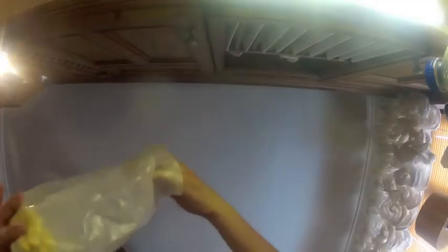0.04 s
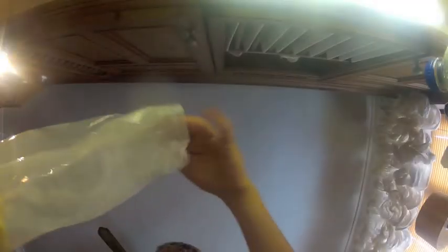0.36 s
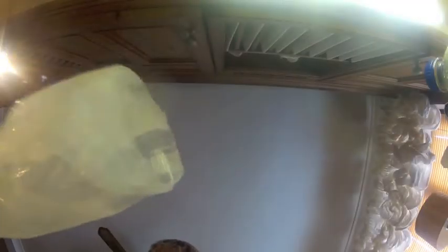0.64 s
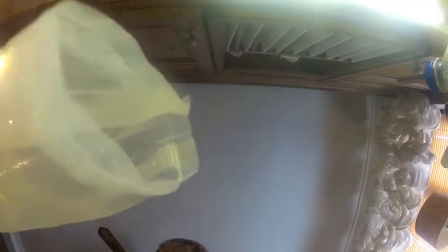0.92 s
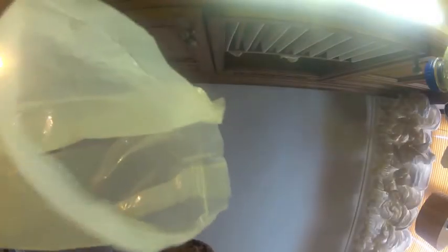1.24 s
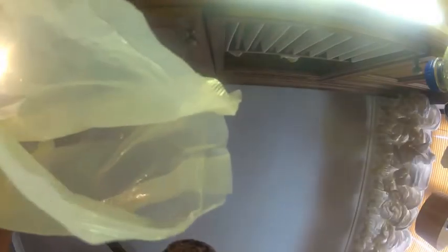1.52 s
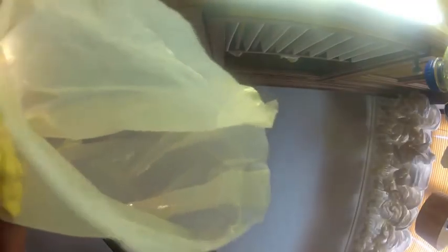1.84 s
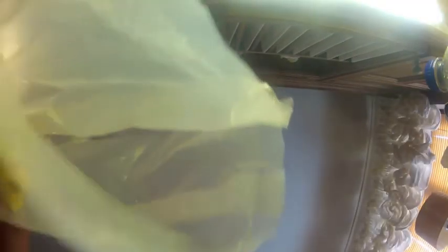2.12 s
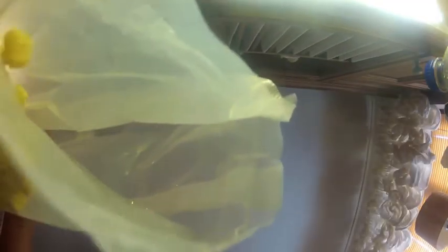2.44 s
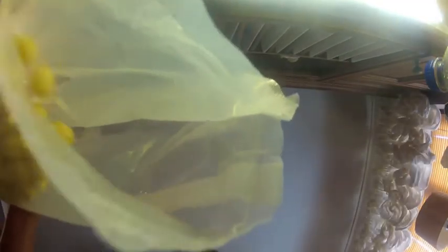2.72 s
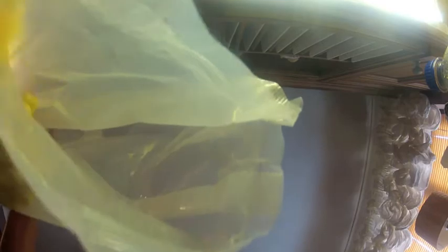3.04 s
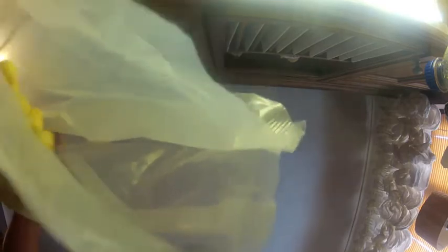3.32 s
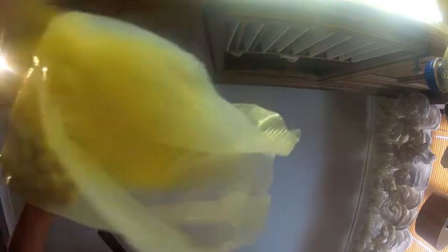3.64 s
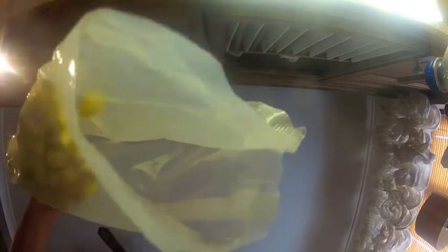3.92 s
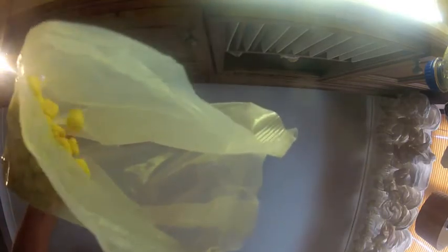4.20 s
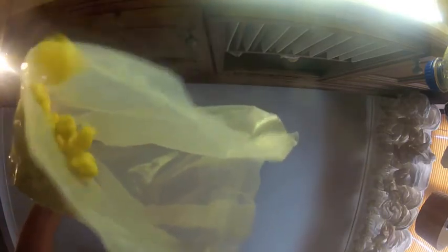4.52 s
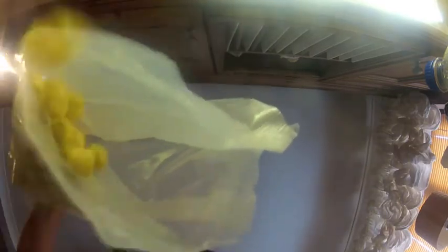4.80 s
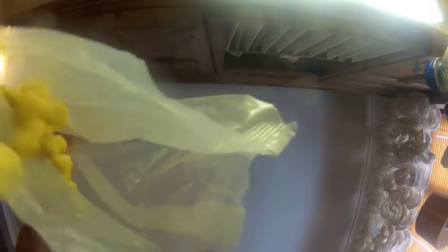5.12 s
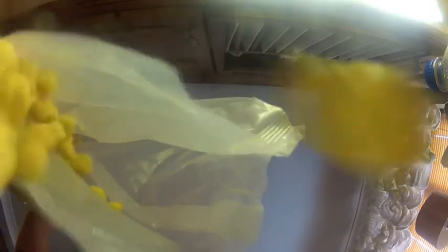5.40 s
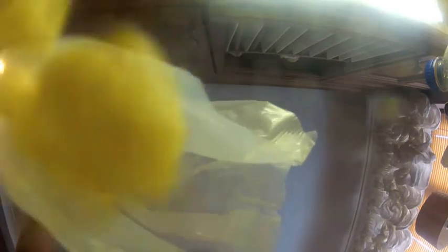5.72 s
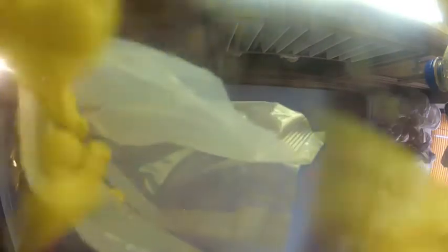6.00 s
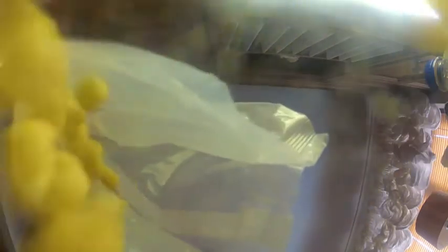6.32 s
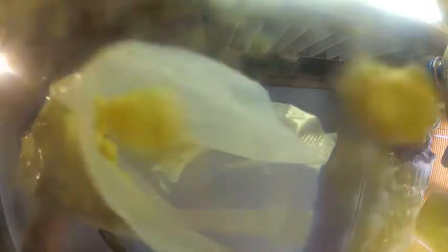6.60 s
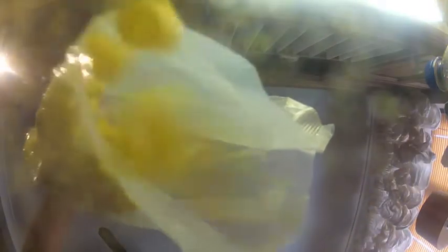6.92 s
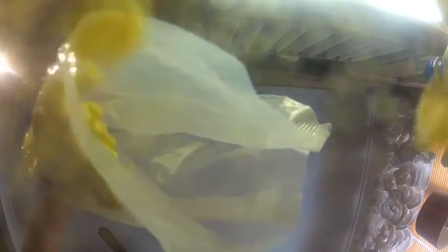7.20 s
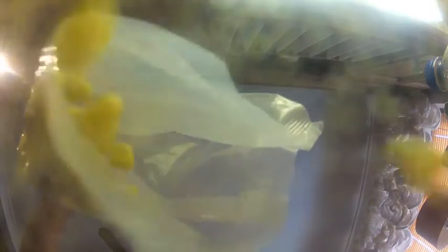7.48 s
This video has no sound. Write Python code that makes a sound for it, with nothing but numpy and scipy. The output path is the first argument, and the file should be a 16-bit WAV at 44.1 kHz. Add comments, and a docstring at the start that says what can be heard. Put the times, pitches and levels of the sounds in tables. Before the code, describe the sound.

Close crinkling of a plastic bag, followed by dry kernels trickling, then streaming into a metal pan with sharp clacks and occasional pings.

```python
"""Dry kernels pour into a metal pan, first one by one, then in a dense stream.
They clack on a small plastic case that lies in the pan with the microphone inside, patter all around
and now and then set the metal ringing. Before the pour, their thin plastic bag rustles as it is opened
and bumps the pan as it is tipped. The hardest clacks overload the microphone's recorder, which also
makes the treble gritty. Faint air noise and mains hum lie underneath."""
import sys
import numpy as np
from scipy import signal
from scipy.fft import rfft, irfft
from scipy.io import wavfile
from scipy.ndimage import uniform_filter1d

SR = 44100
rng = np.random.default_rng(int(sys.argv[2]) if len(sys.argv) > 2 else 0)


def transcribe(u):
    """Save the signal u as a 16-bit wav file named by the first command-line argument.

    u: samples, shape (n,) or (channels, n), limited to [-1, 1]; the rate is SR.
    q: integer samples, one column per channel.
    """
    v = np.clip(np.atleast_2d(u).T, -1, 1)
    q = np.round(v * 32767).astype(np.int16)
    wavfile.write(sys.argv[1], SR, q)


N = 341775

# the hardest kernels to hit the case; the last three columns are relative to the clack:
# (time [s], clack level [dB], favoured pitch [Hz], brightness [dB], knock [dB], thud [dB])
HARD_HITS = [(2.6226, -13, 2090, -8, 7, -17), (2.661, -12.5, 2130, -19, -4.5, -12),
             (2.75, -6.5, 2080, -5.5, -12.5, -8), (2.7712, -23, 2050, 12, -13, -22),
             (2.7846, -9, 2800, -7, -19, -20), (2.839, -16.5, 2150, -7, -10, -28),
             (2.8452, -16, 2040, -8, -8.5, -37), (2.8737, -20, 4070, 2, -15, -30),
             (2.8877, -14, 2050, -4.5, -15, -12), (2.9287, -8, 2040, -13, -6.5, -12),
             (2.9488, -15.5, 2030, -4, -18, -26), (2.9647, -15, 2630, 2, -6, -15),
             (2.9896, -15.5, 2880, -7, -7.5, -19), (3.0126, -10.5, 2610, -10, -15, -18),
             (3.0651, -12.5, 2140, -9, -6, -5), (3.0963, -10, 2640, -2, -19, -27),
             (3.1183, -15.5, 2560, -3, -27, -29), (3.1298, -24.5, 3710, 3, -12, -21),
             (3.167, -22, 2880, -3, -27, -28), (3.1936, -9, 2280, 4.5, -16, -10.5),
             (3.3146, -11.5, 2820, -8, -8, -18), (3.3558, -24, 2710, -5, -14, -27),
             (3.3889, -12.5, 2640, 1, -14, -35), (3.4157, -19.5, 2650, -3, -7.5, -22),
             (3.4757, -11.5, 3130, -6.5, -6.5, -13.5), (3.5179, -12, 3000, -2, -18, -16),
             (3.5352, -21.5, 2970, -6, -12.5, -23), (3.624, -8, 2540, -15, -4.5, -3.5),
             (3.7273, -8, 2540, 0, -6, -8), (3.7463, -16, 4390, 14, -1, -27),
             (3.7699, -8.5, 2520, -10, -5.5, -13), (3.9009, -8, 2150, -3.5, -14.5, -9),
             (3.9211, -13.5, 2180, -6, -14, -27), (3.952, -16.5, 4050, 0, -11, -35),
             (4.0087, -7.5, 2100, -7, -12.5, -24), (4.0206, -20, 2050, -11, -12, -27),
             (4.0466, -16.5, 2870, -3, -10, -26), (4.0556, -17.5, 2760, -6, -14, -26),
             (4.1324, -19, 2710, -10, -15, -20), (4.1526, -18, 2950, 4, -8, -10),
             (4.1671, -17, 2600, -4, -7, -18), (4.1984, -16.5, 2210, -4, -16, -22),
             (4.256, -11.5, 4170, -3, -7, -12), (4.2992, -14, 1960, -13, -14, -12.5),
             (4.3187, -11.5, 2580, -3, -13, -11), (4.339, -8.5, 2530, -2, -19, -7.5),
             (4.3519, -12, 2320, 4, -20, -19), (4.446, -11, 2340, -5.5, -22, -9),
             (4.48, -18, 2400, -6, -43.5, -22), (4.526, -21.5, 2350, -5, -16, -14),
             (4.5674, -8, 2620, -5.5, -2, -8), (4.5914, -15, 4140, 0, -16, -19),
             (4.6326, -17, 3960, 1, -20, -10), (4.6443, -5, 2570, -2, -4.5, -17),
             (4.6694, -12.5, 2560, -5, -4, -2.5), (4.6787, -22, 2270, -5, -19, -22),
             (4.6946, -12, 4010, -1, -22, -15), (4.7135, -15, 4150, 7, -11, -3),
             (4.736, -18, 2040, -7, -8.5, -28), (4.8015, -12.5, 2660, 1, -12.5, -12.5),
             (4.8572, -12.5, 2000, -2, -1, -32), (4.88, -14, 2640, -28, -8, -25),
             (4.9298, -10.5, 2200, -8, -17, -12), (4.9598, -12, 4050, 0, -14, -14),
             (4.9898, -10.5, 3980, -2, -23, -12), (5.006, -15, 3150, 3, -11, -2),
             (5.0895, -15, 3280, -4, -19, -16), (5.2205, -12.5, 2570, -3, -15, -28),
             (5.3053, -11, 3150, -5, -8, -21), (5.386, -13.5, 3020, -4.5, -8, -20),
             (5.4179, -10.5, 2930, -2, -17, -14), (5.4879, -16.5, 2510, 1, -6, -19),
             (5.5462, -15, 2500, -3, -6, -20), (5.5747, -22, 2030, -10, 0, -10),
             (5.6008, -21, 2730, -2, -17, -13), (5.617, -20.5, 2510, -9, -23, -13),
             (5.6484, -13, 2120, -1, -0.5, -1.5), (5.6745, -14.5, 4080, 7, -17, -3),
             (5.7347, -12.5, 2170, 1, -5.5, -33), (5.7548, -15, 2530, 3, -6, -20),
             (5.806, -9.5, 3900, -4, -6, -19), (5.8295, -17, 2400, -3, -2, -1),
             (5.852, -19, 2040, -11, -8, -22), (5.8851, -15.5, 2220, -6, -2.5, -23),
             (5.8922, -14, 2170, 2, -2, -12), (5.932, -17.5, 3770, 2, -8, -4),
             (5.943, -16, 2200, 0, -6, -18), (5.9797, -15.5, 2520, -5, -5, -8.5),
             (6.0088, -14, 2650, -21, -11.5, -34), (6.072, -14, 2530, -3, -5.5, -17),
             (6.142, -16, 2050, -2, -8, -16), (6.2171, -14.5, 2530, -7, -2.5, -10),
             (6.2489, -21, 2130, -8, 0, -3), (6.29, -20.5, 2630, -3, -4, -20),
             (6.3249, -10.5, 2460, -9, -4, -5.5), (6.3428, -11.5, 2580, -9, 3.5, -4.5),
             (6.4068, -15, 2590, -3, -8, -9), (6.4186, -18.5, 2500, 9, 0.5, -6),
             (6.463, -19, 2550, 5, -13, -19), (6.4793, -17.5, 3730, 4, -4, -28),
             (6.5682, -15.5, 2630, -5, -8, -21), (6.5907, -10, 2340, -10, -3, -5.5),
             (6.6467, -18, 2240, 1, -2.5, -25.5), (6.7077, -17.5, 2330, 2, 0, -20),
             (6.7635, -8.5, 2120, -1.5, -2, -15), (6.8272, -13, 2140, -2, 1, -8),
             (6.8987, -15.5, 3230, -10.5, -6, -15), (6.9418, -11.5, 2120, -6, 2, -21),
             (6.9717, -13, 3720, 3, -12, -9.5), (6.9872, -12, 2240, -7, 0.5, -7.5),
             (7.0427, -14, 2140, -6, 1, -22), (7.0647, -17, 2230, -16, 1.5, -23),
             (7.0993, -11, 2040, -0.5, -2.5, -3.5), (7.1418, -18.5, 2270, 1, -12, -18),
             (7.173, -19.5, 3860, 10, -0.5, -3), (7.1967, -16, 3770, 11, -4, -3.5),
             (7.2389, -14, 2200, -4, 2.5, -3), (7.3732, -10, 2200, -2, -0.5, -7.5),
             (7.4372, -16, 2880, -4, -5.5, -9), (7.476, -9, 3730, 4.5, -2, -3.5),
             (7.5161, -16, 2160, -3, -5, -18), (7.5256, -18, 2220, -6, -1, -10),
             (7.5331, -9, 2500, -14, -2, -3.5), (7.5409, -21, 2550, -7, 1, -2),
             (7.6036, -13.5, 2180, -2, 1.5, -12), (7.642, -16.5, 2080, -1, -1, -7),
             (7.6513, -18, 2170, -6, -2.5, -6), (7.6838, -17.5, 2190, -4, -3, -17)]
# the clack of the case's stiff walls: (pitch [Hz], width [Hz], level [dB])
CLACK_MODES = [(1550, 190, -4.5), (2042, 340, 2.5), (2260, 200, 4.5), (2573, 250, 2.5), (2920, 240, 0),
               (3327, 330, -1.5), (3766, 172, 2), (3992, 420, -1.5), (4630, 230, 0), (5400, 690, -2)]
# the hollow knock of the case: (pitch [Hz], width [Hz], level [dB])
KNOCK_MODES = [(714, 282, 4), (932, 478, 1), (1274, 364, -3.5)]
# the thud of the whole case on the pan: (pitch [Hz], width [Hz], level [dB])
THUD_MODES = [(44, 50, -5), (115.4, 97, 0.5), (292, 270, -1)]
# how strongly the kernels flow out of the bag: (time [s], level [dB])
POUR_FLOW = [(2.62, -53), (2.72, -38), (2.78, -41), (2.97, -34), (3.42, -30), (3.68, -43), (3.82, -35),
             (3.98, -37), (4.05, -32.5), (4.2, -24.5), (4.33, -30), (4.42, -40.5), (4.48, -31.5),
             (4.61, -41.5), (4.69, -27), (4.9, -27), (5.1, -23), (6.1, -25), (6.28, -26), (6.55, -23.5),
             (6.74, -27.5), (6.82, -32), (7.03, -34.5), (7.16, -24), (7.5, -35), (7.62, -23.5),
             (7.75, -25.5)]
# light kernels sound hollower once the heap covers the case: (time [s], knock relative to clack [dB])
HOLLOWNESS = [(2.62, -12), (4.2, -8), (5.15, -14.5), (5.8, -7.5), (7.75, -4)]
# kernels that hit bare metal: (time [s], level [dB], ring time [s])
METAL_HITS = [(2.731, -22.5, 0.17), (2.876, -32, .55), (3.12, -38, 0.38), (3.39, -49, .23),
              (3.843, -29, 0.81), (4.155, -41, .4), (5.091, -29, .21), (5.481, -33, 0.34),
              (6.691, -33, 0.31), (7.071, -26.5, 0.24), (7.324, -27, 0.26)]
# the tones of the pan's metal: (pitch [Hz], level [dB])
PAN_MODES = [(1254, -10), (2950, 0), (5141, -1)]
# the boom of the pan's floor, a single row: (pitch [Hz], width [Hz], level [dB])
FLOOR_BOOM = (258, 14, -43.5)
# the bag is opened, swung over the pan and held: (time [s], crinkle level [dB])
BAG_SWING = [(0, -35.5), (.38, -39.5), (.55, -58.5), (.67, -50.5), (.73, -44), (.93, -32.5), (1.05, -35.5),
             (1.3, -39), (1.6, -43), (1.8, -51.5), (2.6, -43), (3.7, -57), (7.75, -45)]
# tugs and shakes of the bag: (time [s], length [s], flutter level [dB], crinkle level [dB])
BAG_TUGS = [(0, 0.11, -31.5, -34.5), (0.167, 0.12, -28, -31.5), (0.29, 0.052, -23, -24.5),
            (1.91, 0.092, -35.5, -42.5), (2.061, 0.12, -35.5, -39), (2.201, 0.13, -40.5, -43),
            (2.373, 0.12, -31, -42.5), (2.512, 0.12, -34, -48), (3.534, 0.091, -32.5, -48),
            (4.524, 0.15, -39.5, -52)]
# the resonances of the crinkling plastic: (pitch [Hz], width [Hz], level [dB])
CREASE_MODES = [(1320, 370, -5.5), (1880, 380, -0.5), (2770, 550, 2), (4040, 800, -1.5), (5200, 1800, -10)]
# large creases snapping: (time [s], level [dB])
CREASE_SNAPS = [(.107, -30), (.119, -31), (.3, -22), (0.336, -22.5), (0.4, -20.5), (0.406, -32),
                (2.47, -37), (2.514, -32.5), (2.563, -35)]
# the tone colour of the flapping plastic: (frequency [Hz], level [dB])
FLUTTER_SPECTRUM = [(25, -11), (60, -10), (130, -1.5), (290, -2), (410, 2), (510, -3.5), (640, 0.5),
                    (780, -6.5), (900, -6), (1100, -19), (1500, -22.5), (3000, -29)]
# the bag flaps more deeply as it goes slack: (time [s], bass gain [dB])
BAG_SLACK = [(0, -7.5), (.4, -1), (.8, 0.5), (1.5, 1), (2.1, 2.5), (3.0, -6), (7.75, -4)]
# soft bumps of the bag on the pan: (time [s], peak level [dB], contact time [s])
BAG_BUMPS = [(0.687, -18, 0.006), (0.6971, -16.5, 0.0037), (0.7224, -6.5, 0.0046), (2.269, -24, 0.0033),
             (2.412, -19.5, 0.00082), (2.574, -14.5, 0.00036)]
# the tones a bump sets off: (pitch [Hz], level [dB], ring time [s])
BUMP_TONES = [(260.5, -6, 0.16), (293, -13, 0.072), (630, 0, 0.031)]
# the case rocks briefly, a single row: (time [s], level [dB], rate [Hz], ring time [s])
CASE_ROCKING = (.905, -25, 24, .27)
# the tone colour of the room's still air: (frequency [Hz], level [dB])
AIR_SPECTRUM = [(18, -33), (30, -10), (54, -11), (70, -12), (249, -18), (420, -13.5), (1300, -28),
                (2560, -38.5), (5500, -64), (7150, -76.5), (12100, -120)]


def kernels(hit_samples=3072):
    """Hard and light kernels hit the case; their blows also keep the pan sounding."""
    chatter = rng.standard_normal((len(HARD_HITS), hit_samples))
    sound, force = case_hits(HARD_HITS, chatter) + light_kernels()
    return sound + floor_boom(force) + wall_ring(force)


def case_hits(rows, chatter, full_force_db=-6.5, light_s=0.00017, hard_s=0.0019, rise_s=0.0001,
              decay_s=0.0011, tail_s=0.0032, tail_db=-22, split_hz=3250, hard_boost_db=5.0):
    """A kernel chatters on the case, longer if it lands hard. Gives two tracks: sound and force."""
    times, level_db, pitches, bright_db, knock_db, thud_db = np.transpose(rows)
    t = np.arange(chatter.shape[1]) / SR
    hardness = np.clip(from_db(level_db - full_force_db), 0, 1)[:, None]
    contact_s = light_s + hard_s * hardness
    envelope = np.exp(-np.maximum(t - contact_s, 0) / decay_s) + from_db(tail_db) * np.exp(-t / tail_s)
    force = chatter * envelope * (1 - np.exp(-t / rise_s))
    # the spot where a kernel lands favours one wall resonance
    walls = np.array([hit + 1.66 * signal.lfilter(*signal.iirpeak(hz, Q=7, fs=SR), hit)
                      for hit, hz in zip(case_walls(force), pitches)])
    # a sharp tip drives the upper resonances, a flat side the lower ones
    lower, upper = (unit_rms(filtered(walls, 7, split_hz, side)) for side in ("low", "high"))
    clack = from_db(2.5) * unit_blow(lower + from_db(bright_db + 2.5)[:, None] * upper)
    knock = from_db(knock_db + 1.5)[:, None] * unit_blow(resonate(force, KNOCK_MODES))
    # the kernel also gives the whole case one short push, of slightly random length
    push_s = (contact_s + 0.00012) * np.exp(0.46 * np.tanh(chatter[:, -1:]))
    push = np.sin(np.pi * np.minimum(t / push_s, 1)) + 0.18 * force
    thud = from_db(thud_db + 0.5)[:, None] * unit_blow(resonate(-push, THUD_MODES))
    gain = from_db(level_db[:, None] + hard_boost_db * hardness ** 2)
    sound = place(times, (clack + knock + thud) * gain)
    return np.array([sound, place(times, force * np.sqrt(hardness))])


def case_walls(force):
    """The stiff plastic walls turn a force into a clack, with the top treble cut away."""
    return filtered(resonate(force, CLACK_MODES), 4, 6000)


def light_kernels(base_per_s=85, tries=640, hit_samples=2048):
    """Random glancing blows, each with its own tone: more and stronger as the flow swells."""
    start, end = POUR_FLOW[0][0], N / SR
    time_dice, land_dice, pitch_dice = rng.random((tries, 3)).T
    level_luck, bright_luck, knock_luck, thud_luck = rng.standard_normal((tries, 4)).T
    chatter = rng.standard_normal((tries, hit_samples))
    times = start + (end - start) * (np.arange(tries) + time_dice) / (tries + 1)
    flow_db = np.interp(times, *np.transpose(POUR_FLOW))
    hollow_db = np.interp(times, *np.transpose(HOLLOWNESS))
    per_s = base_per_s * from_db(0.6 * (flow_db - flow_db.max())) * rebounds()[(times * SR).astype(int)]
    lands = land_dice < per_s * (end - start) / tries
    level_db = np.minimum(flow_db + 3 + 2 * level_luck, -15)
    wall_hz = np.array(CLACK_MODES)[1:7, 0]
    pitches = wall_hz[(pitch_dice * len(wall_hz)).astype(int)]
    bright_db = -4 + 3 * bright_luck
    knock_db = hollow_db + 3 * knock_luck
    thud_db = hollow_db - 13 + 5 * thud_luck
    rows = np.transpose([times, level_db, pitches, bright_db, knock_db, thud_db])
    return case_hits(rows[lands], chatter[lands])


def heap_patter(most_per_s=520, band_hz=(1400, 4400), swell=0.84):
    """Kernels bounce on each other and the pan's floor: ticks in a trickle, a rattle in full flow."""
    flow_db, hollow_db = curve(POUR_FLOW), curve(HOLLOWNESS)
    below_full_db = flow_db - flow_db.max()
    per_s = most_per_s * np.sqrt(from_db(below_full_db))
    clicks = random_clicks(per_s, spread_db=5.0) / np.sqrt(per_s)
    clicks = pan_echoes(clicks, decay_s=0.0015, wet=0.6)
    # light, slow bounces cover a narrower range of pitch than direct hits
    clack = unit_rms(filtered(case_walls(clicks), 2, band_hz, "band"))
    knock = from_db(hollow_db + 2) * unit_rms(resonate(clicks, KNOCK_MODES))
    thud = from_db(hollow_db - 11) * unit_rms(resonate(clicks, THUD_MODES))
    gain = from_db(flow_db.max() - 6 + swell * below_full_db)
    pouring = np.arange(N) / SR > POUR_FLOW[0][0]
    return (clack + knock + thud) * gain * rebounds() * pouring


def rebounds(settle_s=0.035, share=0.32, clump_s=0.28):
    """How busy the bouncing is, around 1: high just after a hard hit, low in the lull that follows."""
    blows = place([row[0] for row in HARD_HITS], np.ones((len(HARD_HITS), 1)))
    busy = signal.lfilter([1], [1, -np.exp(-1 / (settle_s * SR))], blows + 1e-18)
    average = uniform_filter1d(busy, int(clump_s * SR))
    return 1 - share + share * busy / (average + 0.099)


def pan_pings():
    """A kernel on bare metal rings the pan; each strike mixes its tones a little differently."""
    pings = [from_db(db) * sum(from_db(tone_db + rng.normal()) * ring(hz, ring_s)
                               for hz, tone_db in PAN_MODES)
             for _, db, ring_s in METAL_HITS]
    return place([row[0] for row in METAL_HITS], pings)


def floor_boom(force):
    """The pan's floor booms on one low note under the stream."""
    hz, width_hz, db = FLOOR_BOOM
    drive = force * from_db(curve(HOLLOWNESS) / 2)
    return from_db(db) * unit_rms(resonate(drive, [(hz, width_hz, 0)]))


def wall_ring(force, level_db=-55, width_hz=8.8, damping_db_per_s=1):
    """Every blow stirs the pan's metal wall, less and less as the heap damps it."""
    drive = force * from_db(-damping_db_per_s * np.arange(N) / SR)
    modes = [(hz, width_hz, db) for hz, db in PAN_MODES]
    return from_db(level_db) * unit_rms(resonate(drive, modes))


def pan_echoes(clicks, decay_s, wet):
    """Echoes between the pan's walls smear each click for a few milliseconds."""
    t = np.arange(SR // 30) / SR
    echoes = rng.standard_normal(len(t)) * np.exp(-t / decay_s)
    return clicks + wet * signal.fftconvolve(clicks, echoes / np.linalg.norm(echoes))[:N]


def bag_rustle(creases_per_s=6000, flicker_db=2.4, top_hz=5000):
    """The thin plastic flaps with a low rush, while tiny creases crackle and a few large ones snap."""
    flutter_gain, crinkle_gain = bag_handling() * from_db(flicker_db * drift(per_s=60))
    clicks = pan_echoes(random_clicks(creases_per_s, spread_db=3.0), decay_s=0.0016, wet=1.0)
    crinkle = unit_rms(filtered(resonate(clicks, CREASE_MODES), 3, top_hz))
    return bag_snaps() + flutter_gain * bag_flutter() + crinkle_gain * crinkle


def bag_handling(flutter_above_db=7, attack_s=0.019, release_s=0.016):
    """How strong flutter and crinkle are: a slow swing, plus tugs that rise, hold and die away."""
    t = np.arange(N) / SR
    swing_db = curve(BAG_SWING)
    power = from_db([swing_db + flutter_above_db, swing_db]) ** 2
    for start, length, flutter_db, crinkle_db in BAG_TUGS:
        rise = np.clip((t - start) / attack_s, 0, 1)
        fall = np.exp(-np.clip(t - start - length, 0, 1) / release_s)
        power += (from_db([[flutter_db], [crinkle_db]]) * rise * fall) ** 2
    return np.sqrt(power)


def bag_snaps(decay_s=0.001, knock_db=-12, samples=1024):
    """A large crease buckles suddenly: a bright snap with a little hollow body."""
    times, level_db = np.transpose(CREASE_SNAPS)
    bursts = rng.standard_normal((len(times), samples)) * np.exp(-np.arange(samples) / SR / decay_s)
    snap = unit_blow(case_walls(np.diff(bursts, prepend=0)))
    body = from_db(knock_db) * unit_blow(resonate(bursts, KNOCK_MODES))
    return place(times, (snap + body) * from_db(level_db)[:, None])


def bag_flutter(split_hz=240):
    """The low rush of flapping plastic; its deepest flaps grow as it goes slack."""
    deep, rest = (filtered(noise(FLUTTER_SPECTRUM), 3, split_hz, side) for side in ("low", "high"))
    return from_db(curve(BAG_SLACK)) * deep + rest


def bag_bumps():
    """The bag bumps the pan: the longer the contact, the duller the sound."""
    t = np.arange(SR) / SR
    tones = sum(from_db(db) * ring(hz, ring_s) for hz, db, ring_s in BUMP_TONES)
    sounds = []
    for _, db, contact_s in BAG_BUMPS:
        bump = filtered(tones, 1, 1 / contact_s) * (1 - np.exp(-t / contact_s))
        sounds.append(from_db(db) * bump / np.abs(bump).max())
    return place([row[0] for row in BAG_BUMPS], sounds)


def case_rocking():
    """The case rocks in the pan with a brief, very deep wobble."""
    start, db, hz, ring_s = CASE_ROCKING
    return place([start], [from_db(db) * ring(hz, ring_s)])


def room(air_db=-50.5, hum_db=-63, hum_hz=50):
    """Faint air noise and mains hum."""
    hum = np.sqrt(2) * np.sin(2 * np.pi * hum_hz * np.arange(N) / SR)
    return from_db(air_db) * noise(AIR_SPECTRUM) + from_db(hum_db) * hum


def from_db(db):
    """Turns decibels into a gain."""
    return 10 ** (np.asarray(db) / 20)


def unit_rms(x):
    """Scales each row to an average strength (rms) of 1."""
    return x / np.sqrt(np.mean(x ** 2, axis=-1, keepdims=True) + 1e-20)


def unit_blow(x, blow_s=0.005):
    """Gives each row the energy of rms 1 held for blow_s."""
    return unit_rms(x) * np.sqrt(blow_s * SR / x.shape[-1])


def curve(rows):
    """Joins (time, value) points with straight lines, one value per sample."""
    return np.interp(np.arange(N) / SR, *np.transpose(rows))


def drift(per_s):
    """Glides to a new random value per_s times a second."""
    points = rng.standard_normal(N // 40)
    return np.interp(np.arange(N) * per_s / SR, np.arange(len(points)), points)


def noise(spectrum):
    """Noise with the given tone colour, at rms 1."""
    hz, db = np.transpose(spectrum)
    grid_hz = np.maximum(np.fft.rfftfreq(N, 1 / SR), 1)
    gain = from_db(np.interp(np.log(grid_hz), np.log(hz), db))
    return unit_rms(irfft(rfft(rng.standard_normal(N)) * gain, N))


def random_clicks(per_s, spread_db):
    """Clicks at random times, mostly small, a few large."""
    sizes = from_db(spread_db * np.minimum(rng.exponential(1, N), 3)) * rng.choice([-1, 1], N)
    return sizes * (rng.random(N) < per_s / SR)


def filtered(x, order, hz, keep="low"):
    """Keeps the lows, the highs or a band; a higher order cuts more steeply."""
    return signal.sosfilt(signal.butter(order, hz, keep, fs=SR, output="sos"), x)


def resonate(x, modes):
    """Rings modes (an object's own pitches) with x and adds them up with alternating signs."""
    out = 0
    for k, (hz, width_hz, db) in enumerate(modes):
        radius = np.exp(-np.pi * width_hz / SR)
        feed = (1 - radius * radius) / 2 * np.array([1, 0, -1])
        feedback = [1, -2 * radius * np.cos(2 * np.pi * hz / SR), radius * radius]
        out = out + (-1) ** k * from_db(db) * signal.lfilter(feed, feedback, x + 1e-18)
    return out


def ring(hz, ring_s):
    """One second of a pure tone that fades by 60 dB in ring_s."""
    t = np.arange(SR) / SR
    return np.sin(2 * np.pi * hz * t) * np.exp(-np.log(1000) * t / ring_s)


def place(times, sounds):
    """Lays short sounds on one track at their start times."""
    out = np.zeros(N)
    for start, sound in zip(times, sounds):
        at = max(round(start * SR), 0)
        out[at:at + len(sound)] += sound[:N - at]
    return out


def scene():
    """Kernels, pan, bag and room, mixed into one channel."""
    pour = kernels() + heap_patter() + pan_pings()
    return (pour + bag_rustle() + bag_bumps() + case_rocking() + room())[None]


def record(dry, ceiling=0.63, rate_hz=12000, repeats=4, top_hz=15500):
    """A recorder with a low sample rate squashes the hardest clacks and adds a gritty treble."""
    samples = signal.resample_poly(filtered(dry, 8, 5600), rate_hz, SR, axis=-1)
    squashed = samples / (1 + (samples / ceiling) ** 4) ** (1 / 4)
    # holding each sample makes steps, which mirror the sound up into the treble
    held = np.repeat(squashed, repeats, axis=-1)
    gritty = signal.resample_poly(held, SR, repeats * rate_hz, axis=-1)[:, :N]
    return signal.sosfilt(signal.cheby1(12, .2, top_hz, fs=SR, output="sos"), gritty)


dry = scene()
out = record(dry)
transcribe(out)
```